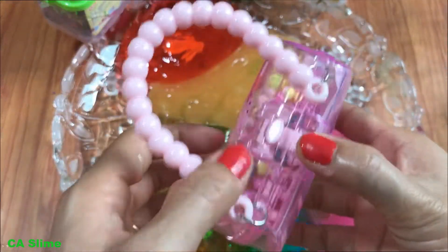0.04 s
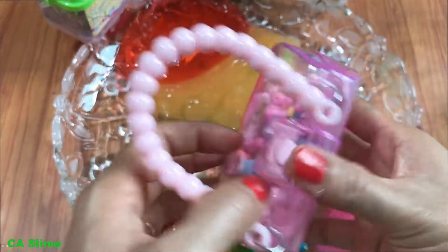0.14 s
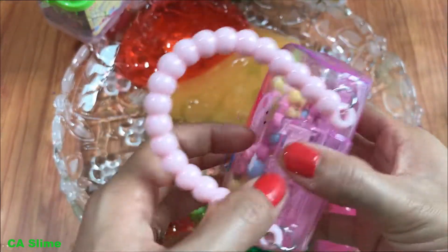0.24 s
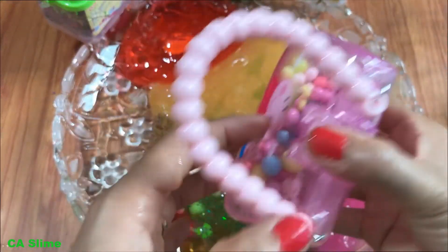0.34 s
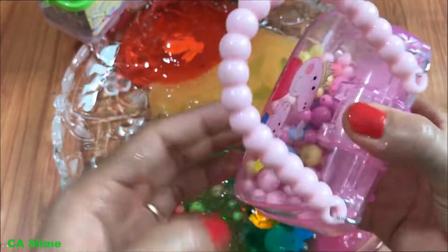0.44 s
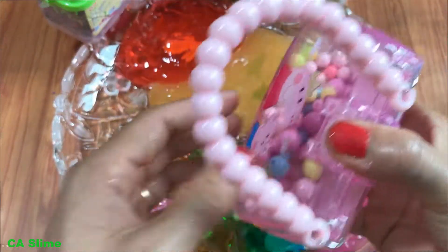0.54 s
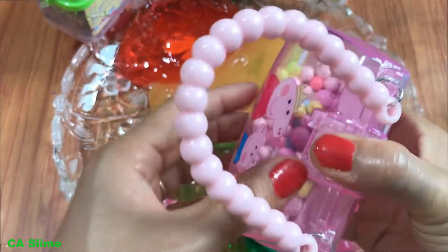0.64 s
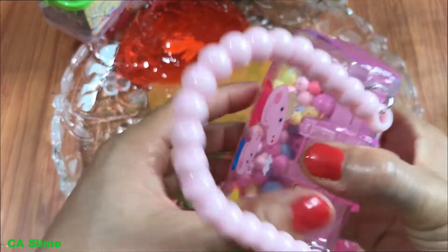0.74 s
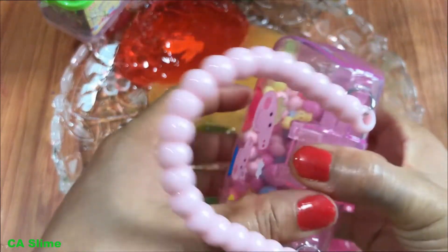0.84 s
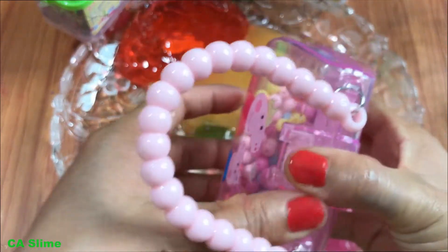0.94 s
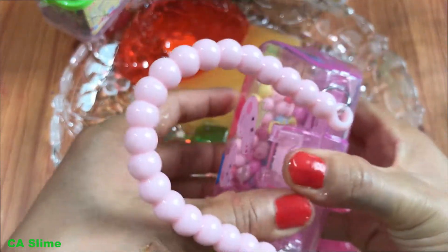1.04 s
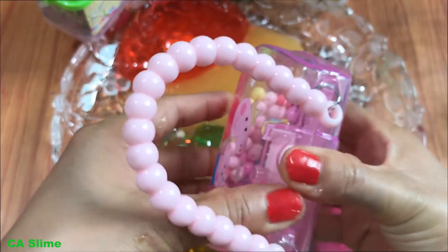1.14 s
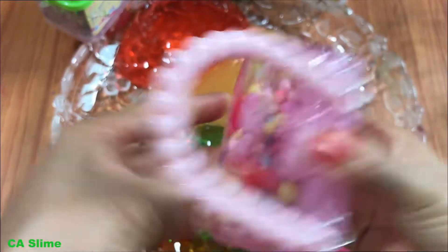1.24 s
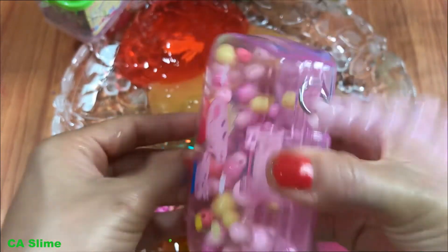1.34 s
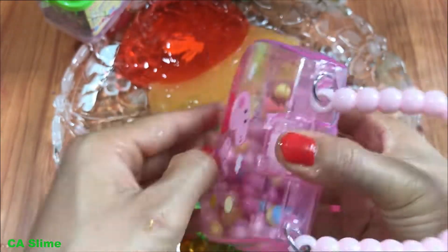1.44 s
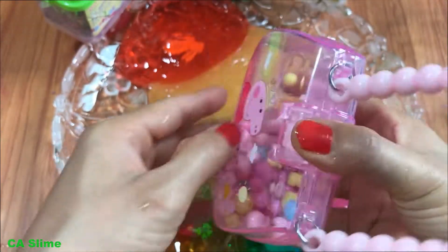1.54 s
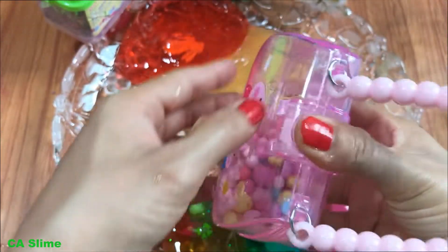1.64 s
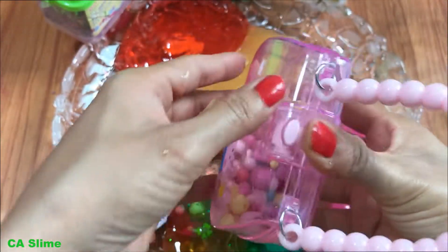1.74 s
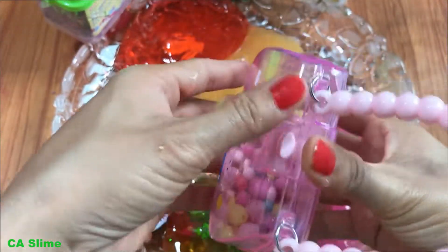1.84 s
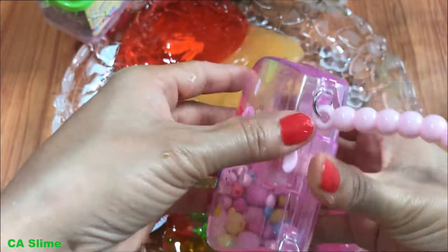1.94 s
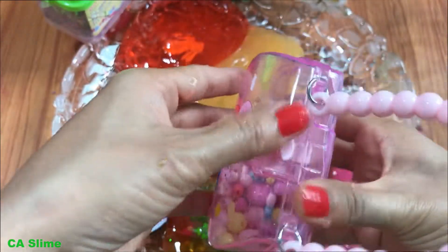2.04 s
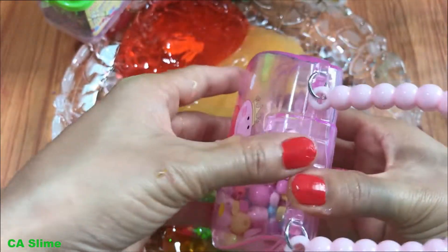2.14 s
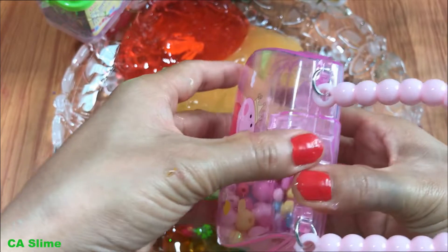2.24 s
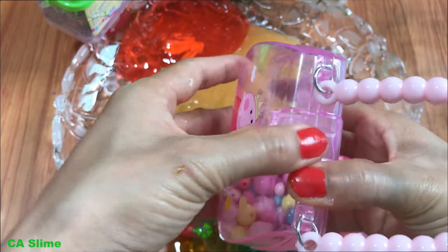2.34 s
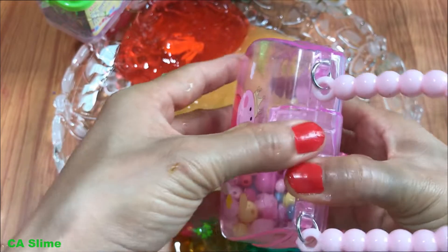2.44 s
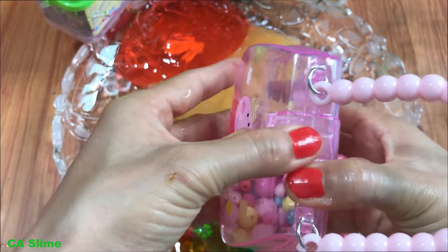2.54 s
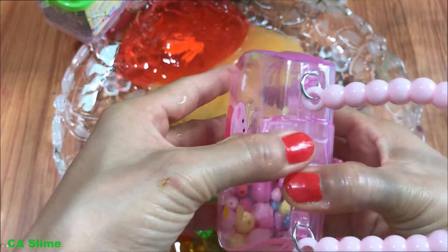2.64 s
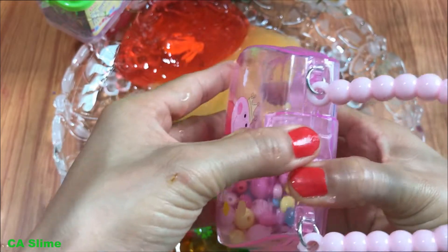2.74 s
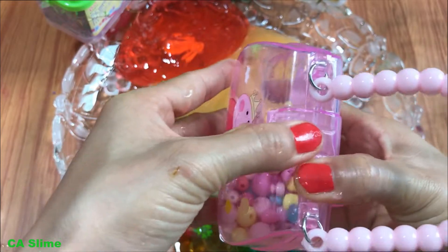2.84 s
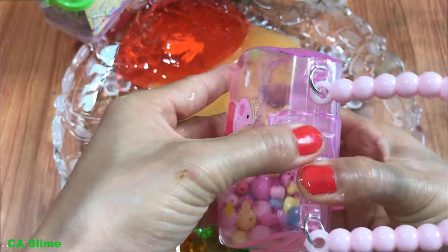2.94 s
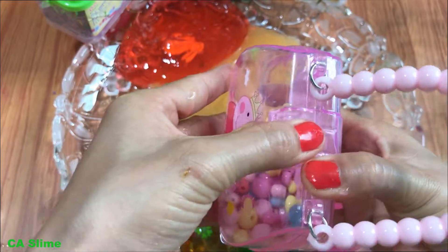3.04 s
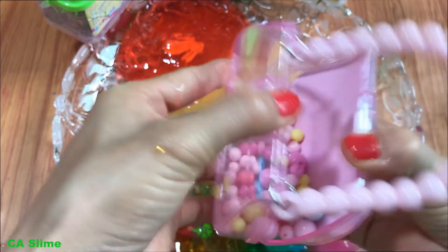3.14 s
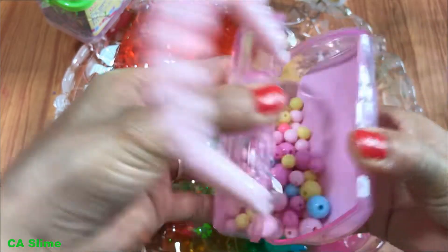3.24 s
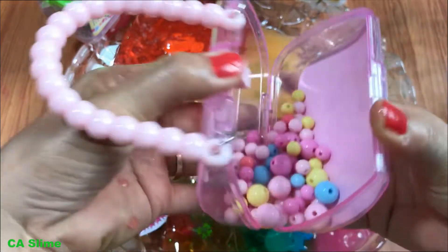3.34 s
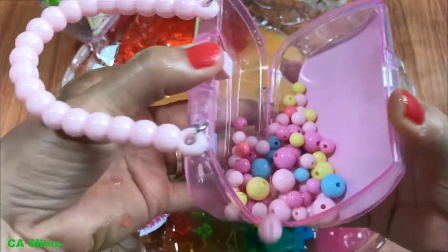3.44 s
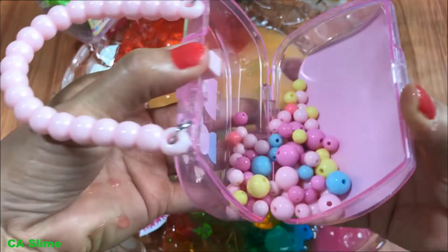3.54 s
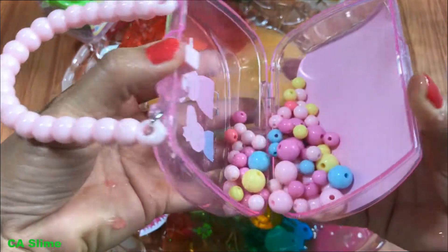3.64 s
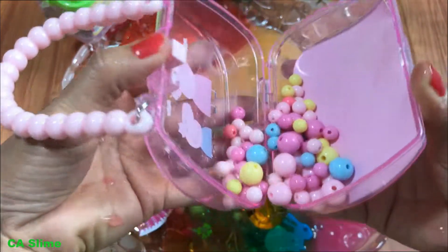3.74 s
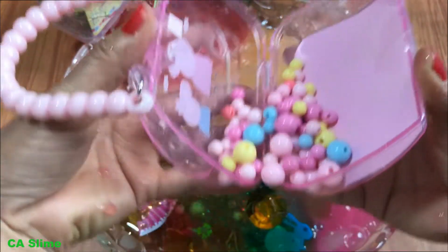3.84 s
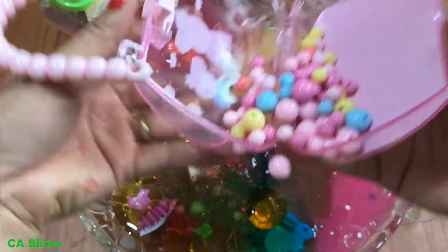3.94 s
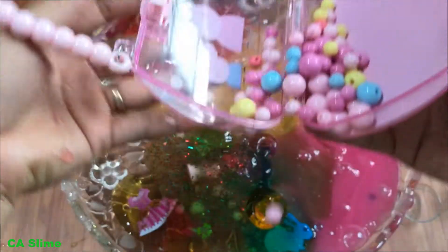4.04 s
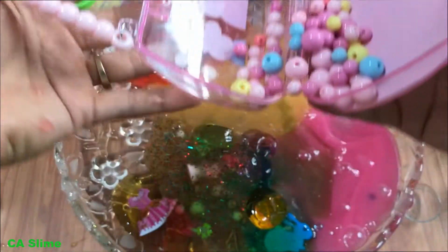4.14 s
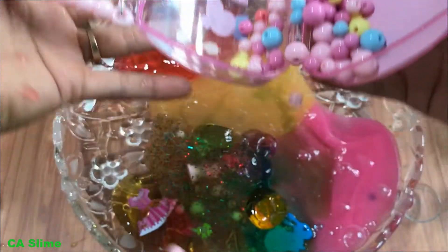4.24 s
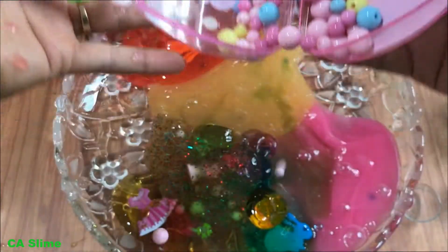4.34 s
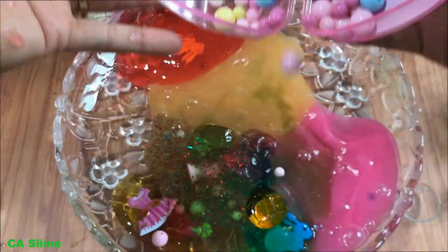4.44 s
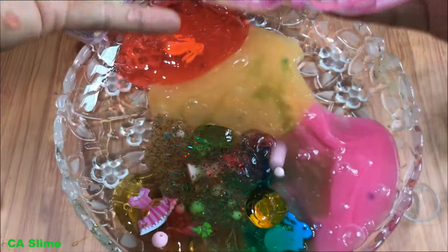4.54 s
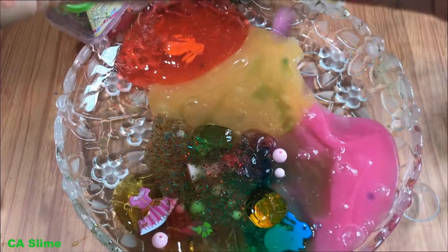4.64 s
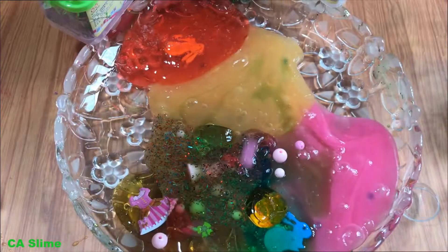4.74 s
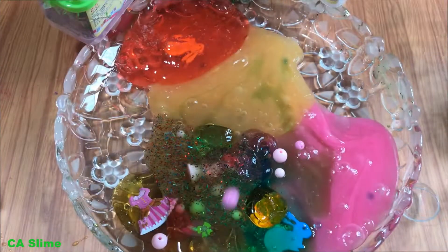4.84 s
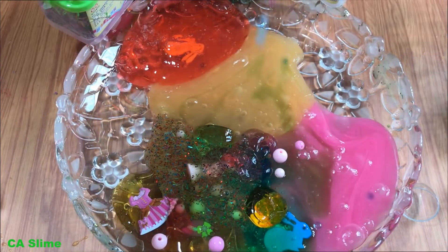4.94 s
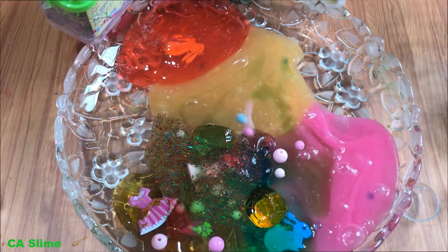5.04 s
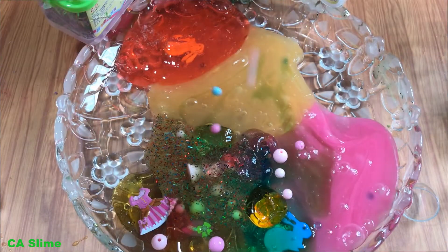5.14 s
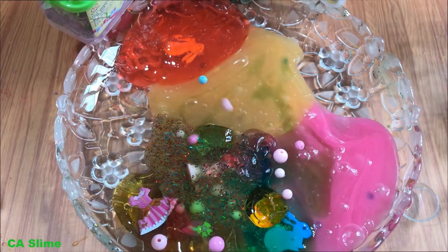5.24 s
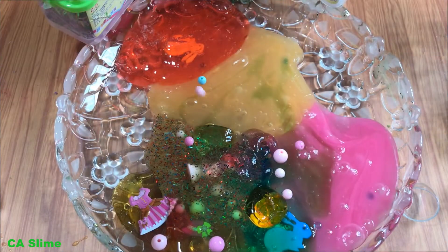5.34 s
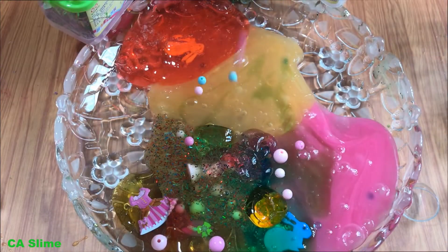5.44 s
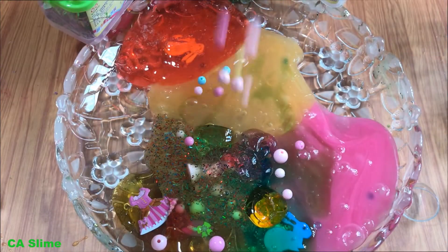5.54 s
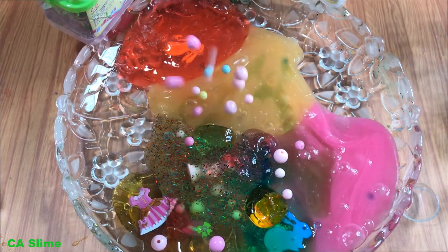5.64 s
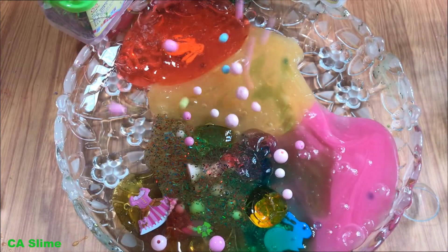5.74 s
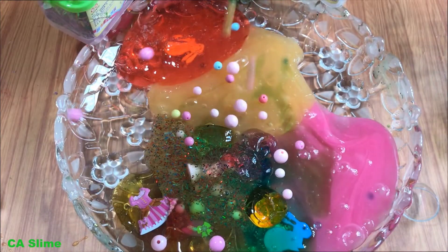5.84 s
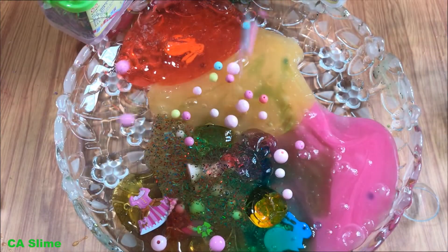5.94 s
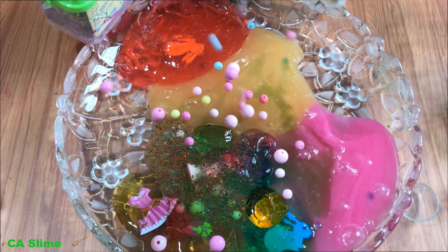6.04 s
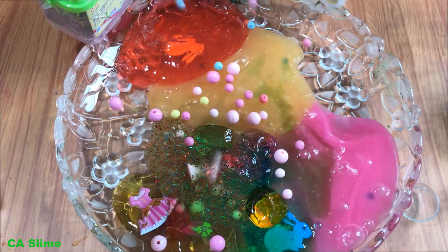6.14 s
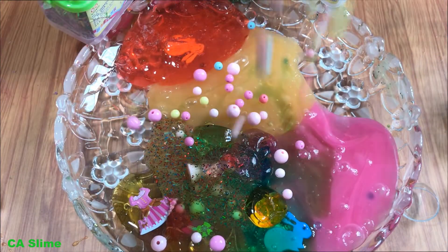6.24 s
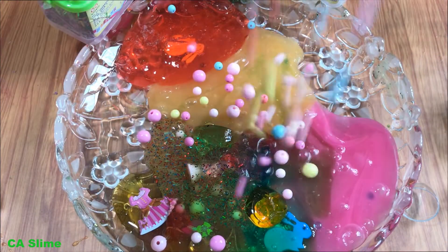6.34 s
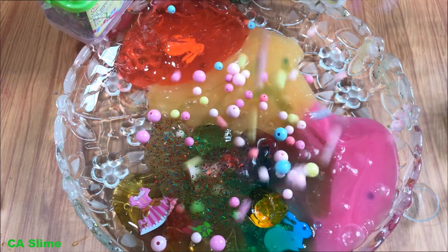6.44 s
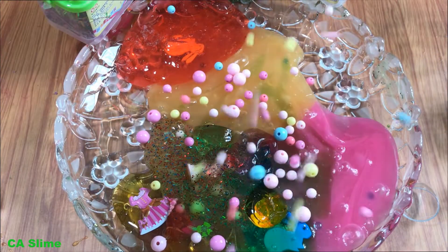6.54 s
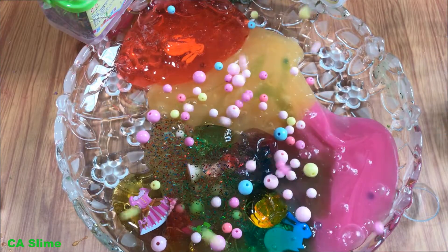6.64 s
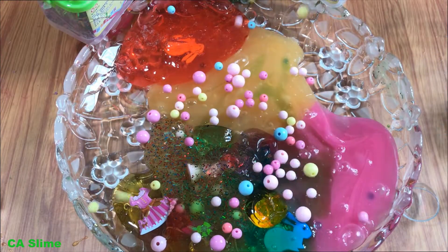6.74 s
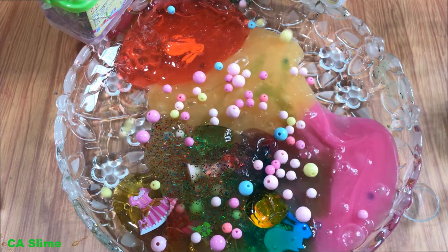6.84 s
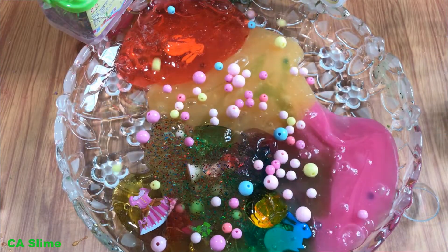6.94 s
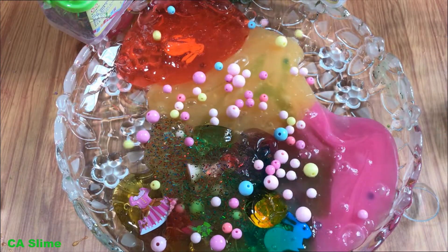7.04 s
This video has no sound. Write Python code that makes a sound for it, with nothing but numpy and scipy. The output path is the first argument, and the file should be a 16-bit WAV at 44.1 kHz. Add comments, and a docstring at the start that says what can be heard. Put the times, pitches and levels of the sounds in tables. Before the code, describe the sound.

A small quiet room, heard very close, with barely audible low room tone. From 0 to 1 s a few light rolls and clicks of plastic beads inside a shut plastic case, strongest near 0.7. At 1.3-1.5 s the case is flipped: a loud, dense, hard rattle with dull knocks, quickly dying. Stray taps fade to near silence from 2 to 3 s. Around 3.1-3.25 s a faint creak, latch scrape and sharp snap. From 3.4 s beads tick and slide in the open shell, with glassy clacks at 3.7 and 3.8 and a flurry around 4.1-4.2. Scattered taps follow to 5 s, then crisp clusters at 5.3-5.55 and 5.65-5.8. Soft thuds in slime begin near 6 s; the brightest, fullest spill comes at 6.2-6.35, then ticks, glass clicks and thuds to 6.9, ending in a small bright rattle at about 7 s.

```python
"""Beads in a plastic case, tipped over slime

Small plastic beads roll and rattle in a hand-held plastic case, which is turned over, prised open and tipped.
They slide along the open shell, knock on it and drop onto slime in a glass bowl; close up, in a small quiet room.
Each hard contact is a burst of damped, coloured noise, most with the ringing modes of the case or bowl.
The sliding heap and a latch scrape are crowds of such contacts; dull knocks, a faint creak and thuds in the
slime are clusters of low modes."""
import sys
import numpy as np
from scipy import signal
from scipy.fft import rfft, irfft
from scipy.io import wavfile
from scipy.ndimage import uniform_filter1d

SR = 44100
rng = np.random.default_rng(int(sys.argv[2]) if len(sys.argv) > 2 else 0)


def materialize(psi):
    """Save the field psi as 16-bit PCM at rate SR to the path in sys.argv[1].

    A 1-D psi becomes a single channel; in a 2-D psi each row is a channel.
    """
    bounded = np.clip(np.atleast_2d(psi).T, -1, 1)
    quanta = np.round(bounded * 32767).astype(np.int16)
    wavfile.write(sys.argv[1], SR, quanta)


N = 313551   # length [samples]
OPENS_S = 3.3   # contacts before this ring the shut case
CONTACT_SIZE = 2048   # length of one contact [samples]


def from_db(db):
    """Decibels to gain."""
    return 10 ** (np.asarray(db) / 20)


def unit(x):
    """Each row scaled to energy 1."""
    return x / np.sqrt(np.sum(x ** 2, axis=-1, keepdims=True) + 1e-20)


def at_hz(points, hz):
    """A table read on a log-frequency axis."""
    f, value = np.transpose(points)
    return np.interp(np.log(np.maximum(hz, 1)), np.log(f), value)


def bins(size):
    """Frequencies of a spectrum's bins."""
    return np.fft.rfftfreq(size, 1 / SR)


def each(times, value):
    """The same value for every contact."""
    return np.full(len(times), value, float)


def place(times, sounds):
    """Short sounds laid on the time line."""
    out = np.zeros(N + sounds.shape[1])
    starts = np.clip(times * SR, 0, N - 1).astype(int)
    for at, sound in zip(starts, sounds):
        out[at:at + len(sound)] += sound
    return out[:N]


# colour of the room tone: (frequency [Hz], relative density [dB per Hz])
ROOM_TONE_COLOUR = [(24, -14.5), (48, 1), (120, -5.5), (250, -9), (500, -17), (1000, -18.5), (4000, -30.5),
                    (8000, -33), (16000, -32.5)]
ROOM_TONE_DB = -66.5   # RMS level


def hush():
    """Faint, mostly low room tone: noise shaped in the spectrum."""
    colour = from_db(at_hz(ROOM_TONE_COLOUR, bins(N)))
    noise = irfft(rfft(rng.standard_normal(N)) * colour, N)
    return from_db(ROOM_TONE_DB) * np.sqrt(N) * unit(noise)


# how long the room rings: (frequency [Hz], decay by 60 dB [s])
ROOM_DECAY = [(150, 0.96), (1500, 0.39), (4000, 0.58), (8000, 0.34), (15000, 0.85)]


def room(x, wet_db=-15.5, table_db=-16.5, table_t60=0.026, gap_s=0.002):
    """Quick reflections from bowl and table, then a diffuse tail that decays at its own rate in each band."""
    t = np.arange(int(SR * .7)) / SR
    edges = np.geomspace(100, 17000, 9)
    tail = 0
    for low, high in zip(edges, edges[1:]):
        band_filter = signal.butter(2, [low, high], "band", fs=SR, output="sos")
        band = signal.sosfilt(band_filter, rng.standard_normal(len(t)))
        hz = np.sqrt(low * high)
        band_db = at_hz([(300, -2.5), (1200, 2.5), (5000, -2), (13000, -6.5)], hz)
        tail = tail + band * from_db(band_db - 60 * t / at_hz(ROOM_DECAY, hz))
    near = rng.standard_normal(len(t)) * from_db(-60 * t / table_t60)
    diffuse = from_db(wet_db) * unit(tail * (t > 2 * gap_s))
    reflections = from_db(table_db) * unit(near * (t > gap_s))
    return x + signal.fftconvolve(x, diffuse + reflections)[:N]


def widen(x, side_db=-28.5, above_hz=5000, size=96):
    """A faint scattered copy, treble only, is added left and subtracted right."""
    scatter = np.convolve(x, unit(rng.standard_normal(size)))[:N]
    treble_only = signal.butter(14, above_hz, "high", fs=SR, output="sos")
    side = from_db(side_db) * signal.sosfilt(treble_only, scatter)
    return np.array([x + side, x - side])


def swell(t, rise_s):
    """The sound builds up as the blow spreads through the plastic."""
    return 1 - np.exp(-t / np.maximum(rise_s, 1 / SR)[:, None])


def tone_db(hz, body, treble, body_hz=1500, middle_hz=3300, bright_hz=6500, treble_hz=11500):
    """Heavy blows have more body, small hard ones more treble."""
    body_tilt = at_hz([(body_hz, 1), (middle_hz, 0)], hz)
    treble_tilt = at_hz([(bright_hz, 0), (treble_hz, 1)], hz)
    return np.outer(body, body_tilt) + np.outer(treble, treble_tilt)


# basic colour of a bead's clack: (frequency [Hz], relative density [dB per Hz])
CLACK_COLOUR = [(250, -20), (450, -22.5), (620, -16.5), (820, -7.5), (1150, -6), (1450, -3), (1850, -3),
                (2300, -1.5), (2900, 0), (4500, 2.5), (6500, 4.5), (9000, 1.5), (12500, -4.5), (16000, -5)]
BEAD_PITCH_DB = 10   # how far a bead's own pitch stands out of its clack


def clack(body, treble, t60, crack=1.2, crack_s=0.00081, rise=0.014, low_hz=2200, high_hz=13000):
    """A brief crack, then crowded, quickly damped overtones around a pitch drawn for each bead."""
    t, hz = np.arange(CONTACT_SIZE) / SR, bins(CONTACT_SIZE)
    decay = from_db(-60 * t / np.maximum(t60, .002)[:, None])
    envelope = decay + crack * np.exp(-t / crack_s)
    pitch = low_hz * (high_hz / low_hz) ** rng.random((len(t60), 1))
    near_pitch = np.exp(-(np.log((hz + 1) / pitch) / .13) ** 2)
    bead_db = BEAD_PITCH_DB * near_pitch
    colour = from_db(at_hz(CLACK_COLOUR, hz) + tone_db(hz, body, treble) + bead_db)
    noise = irfft(rfft(rng.standard_normal(envelope.shape)) * colour)
    overtones = noise * envelope * swell(t, rise * t60)
    # so small a radiator gives off almost no bass
    return unit(signal.sosfilt(signal.butter(3, 420, "high", fs=SR, output="sos"), overtones))


def ring(modes, body, treble, t60, spread_db, grip, rise=0.0043):
    """Every contact point wakes the modes with strengths of its own; gripping fingers detune them a little."""
    hz, db, mode_t60 = np.transpose(modes)
    t = np.arange(CONTACT_SIZE) / SR
    shapes = unit(np.sin(2 * np.pi * np.outer(hz, t)) * from_db(-60 * t / mode_t60[:, None]))
    luck = rng.standard_normal((len(body), 3, len(hz)))   # for sign, strength and detuning
    strength_db = db + spread_db * luck[:, 1] + .5 * tone_db(hz, body, treble)
    rings = (np.sign(luck[:, 0]) * from_db(strength_db)) @ shapes
    stretch = 1 + grip * luck[:, 2, 0]
    rings = np.array([np.interp(t * k, t, one, right=0) for k, one in zip(stretch, rings)])
    return unit(rings * swell(t, rise * t60))


# modes of the shut case: (frequency [Hz], level [dB], decay by 60 dB [s])
SHUT_CASE_MODES = [(700, -13.5, 0.12), (1102, -1, .04), (1457, 3, 0.061), (1620, 1, .03), (2298, -1, 0.075),
                   (3120, 3.5, .035), (3776, 3, 0.073), (4170, 3.5, .03), (4350, 2, .025), (5840, 5, .025),
                   (6250, -7, .02), (6840, -5, .02), (9120, 1.5, .02)]


def strike(times, energy_db, body, treble, t60, share, ring_once_open):
    """Each contact is a clack plus the ring of what is hit: at first always the shut case."""
    share = np.clip(share, 0, 1)[:, None]   # of the energy, in the modes
    shut = times < OPENS_S
    shut_rings = ring(SHUT_CASE_MODES, body, treble, t60, spread_db=3.5, grip=0.011)
    rings = np.where(shut[:, None], shut_rings, ring_once_open)
    sounds = np.sqrt(1 - share) * clack(body, treble, t60) + np.sqrt(share) * rings
    return place(times, sounds * from_db(energy_db)[:, None])


def thuds(times, db, hz, t60, rise_s=0.00058, spread_octaves=.7, flank_db=-7.5, flank_damping=4.4, count=11):
    """Soft contacts: a damped low mode flanked by weaker neighbours that die sooner."""
    t = np.arange(SR // 6) / SR
    offset = np.linspace(-1, 1, count)   # 0 is the main mode
    spread = spread_octaves * offset * rng.uniform(0.7, 1, (len(times), count))
    pitches = hz[:, None] * 2 ** spread
    signs = rng.choice([-1, 1], (len(times), count, 1))
    mode_t60 = t60[:, None] / (1 + flank_damping * np.abs(offset))
    decay_db = -60 * t / mode_t60[:, :, None]
    levels = from_db(flank_db * np.sqrt(np.abs(offset))[:, None] + decay_db)
    modes = signs * levels * np.sin(2 * np.pi * pitches[:, :, None] * t)
    sounds = .5 * modes.sum(axis=1) * from_db(db)[:, None]
    return place(times, sounds * swell(t, each(times, rise_s)))


TICK_BODY_DB, TICK_TREBLE_DB, TICK_T60_S, TICK_CRACK_S = -8, 24, .0035, .0004


def tick(times, db):
    """Bead on bead: nothing large rings, so the clack is tiny and all treble."""
    body, treble = each(times, TICK_BODY_DB), each(times, TICK_TREBLE_DB)
    sounds = clack(body, treble, each(times, TICK_T60_S), crack=3.4, crack_s=TICK_CRACK_S)
    return place(times, sounds * from_db(db)[:, None])


# the heap of beads slides; at 3.12 s the latch scrapes as the case is opened:
# (start [s], length [s], relative level [dB], body [dB], treble [dB])
SLIDES_AND_SCRAPE = [(0.033, .03, -45, 10, -4), (0.08, .42, -49, 5, -7), (0.159, .04, -41.5, 5.5, -6.5),
                     (0.262, .085, -38.5, 4.5, -2), (0.552, .07, -38.5, 5, -9), (0.688, .015, -33, 5, -8),
                     (0.812, .06, -40.5, 7.5, -5.5), (1.03, .12, -64, 8, -13), (1.325, .025, -38, 13.5, -3),
                     (1.365, .04, -22, 7, 1), (1.412, .03, -18, 2, 4), (1.469, .04, -15.5, 3.5, 0.5),
                     (1.618, .08, -41, 4, -4), (1.891, .06, -54, 12, -13), (2.114, .06, -58, 14, -10),
                     (3.12, .05, -61, 30.5, -6), (3.179, .03, -33, 16, 13), (3.248, .012, -22.5, 3, 3),
                     (3.363, .29, -44, 7, -6), (3.865, .02, -44, 6, 11), (4.013, .05, -37, 7, -7),
                     (4.107, .085, -27.5, 3, 4.5), (4.359, .04, -44, 12, 0), (4.504, .085, -33, -2, -0.5),
                     (4.645, .015, -29.5, 3, 5), (4.78, .01, -39, -2, -17), (4.851, .17, -48, 7, -15),
                     (5.233, .04, -46, 11, -1), (4.935, .015, -34, 4, 1), (5.30, .04, -33, -9, 4),
                     (5.351, .10, -25.5, -0.5, 1), (5.49, .05, -30, -0.5, -2), (5.635, .07, -33, 6, 3),
                     (5.757, .11, -31, 2, 10), (5.926, .11, -44, 20, 9), (6.087, .03, -32, 5.5, 4),
                     (6.152, .04, -36, 11, -5), (6.194, .085, -20, -5.5, 8.5), (6.305, .095, -30, 4, 4.5),
                     (6.411, .19, -42, 4, -6), (6.489, .05, -35, 11, 15), (6.623, .015, -34, 22, 9),
                     (6.694, .015, -28, 10, 16), (6.894, .015, -32, 22.5, 26), (6.98, .13, -49, 14, 15)]
SLIDE_RISE_DB_PER_S, SLIDE_FALL_DB_PER_S = 801.5, 259.5   # the heap gives way at once and stops more slowly
SETTLE_DB, SETTLE_DB_PER_S = -18, 80   # a few beads go on settling


def motion(t):
    """Level, body and treble of heap and latch in dB: each rises, holds, falls, settles; the strongest counts."""
    start, length, db, body, treble = np.transpose(SLIDES_AND_SCRAPE)
    before = np.maximum(start - t[:, None], 0)
    after = np.maximum(t[:, None] - start - length, 0)
    release_db = np.maximum(-SLIDE_FALL_DB_PER_S * after, SETTLE_DB - SETTLE_DB_PER_S * after)
    slides_db = db - SLIDE_RISE_DB_PER_S * before + release_db
    strongest = slides_db.argmax(axis=1)
    return slides_db.max(axis=1), body[strongest], treble[strongest]


# modes of the open shell, for heap and taps: (frequency [Hz], level [dB], decay by 60 dB [s])
OPEN_SHELL_MODES = [(833.7, -9, 0.04), (1560, -14.5, 0.042), (2056, -0.5, 0.036), (2311, 3.5, 0.034),
                    (3138, -3.5, 0.083), (5235, -8, 0.018), (6504, 12, 0.026)]
SHUT_CROWDING = 1.8   # penned in the shut case, the beads collide this much more often


def heap_and_latch(gain_db=-0.5, clack_t60=0.027, share=0.15, uneven_db=6.5, count=1700):
    """The shifting heap and the latch scrape: many small uneven contacts, denser the harder the motion."""
    t = np.arange(N) / SR
    level_db = np.interp(t, t[::40], motion(t[::40])[0])
    busy = from_db(.42 * level_db) * np.where(t < OPENS_S, SHUT_CROWDING, 1)
    per_sample = count * busy / busy.sum()
    times = np.interp(np.arange(count) + rng.random(count), np.cumsum(per_sample), t)
    size_db = uneven_db * np.clip(rng.standard_normal(count), -2, 1.4)
    # neighbouring contacts share the energy of the motion
    size_db = size_db - 10 * np.log10(uniform_filter1d(from_db(size_db) ** 2, size=9))
    energy_db = gain_db + size_db + np.interp(times, t, level_db - 10 * np.log10(per_sample))
    _, body, treble = motion(times)
    t60 = each(times, clack_t60)
    plastic = ring(OPEN_SHELL_MODES, body, treble, t60, spread_db=8.5, grip=0.016)
    return strike(times, energy_db, body, treble, t60, each(times, share), plastic)


# dull knocks, and at 3.102 s a faint creak, as the case is handled and opened,
# and a heavy bead sinking in the slime: (time [s], level [dB], pitch [Hz])
KNOCKS_AND_CREAK = [(0.151, -37.5, 1073), (0.194, -38.5, 1098), (0.984, -44, 200), (1.011, -35.5, 240),
                    (1.284, -39, 660), (1.313, -33.5, 243), (1.318, -33.5, 723), (1.358, -27, 297),
                    (1.362, -25.5, 626), (1.366, -30.5, 129), (1.39, -29.5, 189), (1.422, -24, 680),
                    (1.490, -28, 686), (3.102, -50, 690), (3.173, -32.5, 760), (3.178, -25, 962),
                    (3.181, -27, 100), (3.210, -34, 1110), (3.254, -20, 1013), (5.971, -32, 384),
                    (5.972, -33.5, 602)]
KNOCK_T60_S, KNOCK_T60_SLOPE = 0.14, .5   # at 1 kHz; the hand damps lower knocks faster, by this power of pitch


def knocks_and_creak(gain_db=0.0):
    """Dull knocks and a faint creak; the lower they are, the sooner they die."""
    times, db, hz = np.transpose(KNOCKS_AND_CREAK)
    t60 = KNOCK_T60_S * (hz / 1000) ** KNOCK_T60_SLOPE
    return thuds(times, db + gain_db, hz, t60)


# modes of the glass bowl, damped by the slime, for landings and hits:
# (frequency [Hz], level [dB], decay by 60 dB [s])
BOWL_MODES = [(838, -11.5, 0.02), (1676, -10, 0.018), (2363, 7.5, 0.015), (2435, 7.5, 0.02),
              (3415, 1.5, 0.047), (4214, -0.5, 0.039), (5170, -46, 0.052), (5910, -1, 0.029),
              (7270, 2, 0.031), (8640, -0.5, 0.064), (9550, -6, 0.036), (11630, 4, 0.02), (13400, 2, .025)]
# a bead lands on the slime, clicking against those already there:
# (time [s], relative level [dB], treble [dB], thud pitch [Hz])
SLIME_LANDINGS = [(5.9693, -25, -26, 840), (6.0053, -29.5, 1, 860), (6.422, -24.5, 10, 1240),
                  (6.4623, -24, -2, 1006), (6.4961, -26.5, 5.5, 1290), (6.5344, -23, 10.5, 1214),
                  (6.65, -31.5, 14, 994), (6.842, -28, 2, 880), (6.9061, -23, 2.5, 1210)]
LANDING_BODY_DB, LANDING_T60_S = 8.5, 0.025
LANDING_TICK_DB = -3.5   # relative to the click
THUD_DB, THUD_T60_S = -1.5, 0.06   # the slime's thud, relative to the listed level


def landings(gain_db=25.0, share=0.13):
    """A short click, a trace of the glass, a tick against a neighbour and a thud in the slime."""
    times, db, treble, hz = np.transpose(SLIME_LANDINGS)
    body, t60 = each(times, LANDING_BODY_DB), each(times, LANDING_T60_S)
    glass = ring(BOWL_MODES, body, treble, t60, spread_db=6.0, grip=0)
    clicks = strike(times, db + gain_db, body, treble, t60, each(times, share), glass)
    neighbours = tick(times, db + gain_db + LANDING_TICK_DB)
    slime = thuds(times, db + THUD_DB, hz, each(times, THUD_T60_S), spread_octaves=0.42)
    return clicks + neighbours + slime


# two small beads meet: (time [s], relative level [dB])
BEAD_TICKS = [(5.1476, -25.5), (5.678, -26), (5.6869, -19.5), (5.7969, -25), (5.8062, -23), (6.451, -36),
              (6.510, -36), (6.5461, -32), (6.5917, -17), (6.671, -26), (7.0102, -37)]


def ticks(gain_db=19.0):
    """Thin ticks among the falling beads."""
    times, db = np.transpose(BEAD_TICKS)
    return tick(times, db + gain_db)


# a bead strikes the glass:
# (time [s], relative level [dB], body [dB], treble [dB], share of energy in the bowl's modes [0-1])
GLASS_HITS = [(3.6727, -17.5, 8.5, -1.5, 0.62), (3.8384, -17, 8.5, -7, 0.79), (4.2258, -26, 1, -14, 1),
              (4.2896, -25, -1, -14, 0.56), (4.3904, -29.5, 6, 2, .45), (4.6423, -21, 6.5, -1, 0.25),
              (4.6838, -29.5, 14, -23, .5), (5.5541, -26, 6.5, -8, .45), (5.9408, -21, 1, -9, 0.74),
              (6.622, -24.5, -23, 1, 0.9), (6.692, -20.5, 3.5, 6.5, 0.35), (6.7553, -25.5, 12, 3, .7),
              (6.891, -29.5, 14, 4, 0.35)]
BOWL_CLACK_T60_S = 0.064


def bowl_hits(gain_db=26.5):
    """Beads that miss the slime make the glass ring, the more the cleaner they hit."""
    times, db, body, treble, share = np.transpose(GLASS_HITS)
    t60 = each(times, BOWL_CLACK_T60_S)
    glass = ring(BOWL_MODES, body, treble, t60, spread_db=2.0, grip=0, rise=0.023)
    return strike(times, db + gain_db, body, treble, t60, share, glass)


# a bead taps the plastic: (time [s], relative level [dB], body [dB], treble [dB])
PLASTIC_TAPS = [(0.032, -38, 6, 3), (0.1502, -31.5, -5, -2), (0.1946, -38, -3, 4), (0.3268, -34, -16, 6),
                (0.428, -37, 4, -5), (0.4987, -35.5, 3, 0), (0.5404, -36.5, -2, -3), (0.5653, -32, -11, 12),
                (0.6085, -36, 12, 2), (0.6864, -28.5, 7.5, -8), (0.6964, -25.5, -20, 5),
                (0.7802, -34, 3, -11), (0.8126, -34, -30, 1), (0.855, -39, 6, -4.5),
                (0.8712, -37.5, -5, -9), (0.982, -44, 12, -23), (1.006, -37.5, 14, -5),
                (1.2803, -44, 4, -4), (1.3226, -34, 12, -1), (1.358, -18.5, -37, -15),
                (1.4153, -14.5, -1, 1), (1.434, -14.5, 10, 4), (1.4725, -28, 7, 11), (1.489, -15.5, 5, 15),
                (1.545, -26, 0, 8), (1.750, -38, 21, -10), (1.7859, -35.5, 4, -4), (1.891, -46, -24, -3),
                (1.958, -50, 3, -7), (2.019, -51, 19, -5), (2.0942, -44.5, 3, -8), (2.148, -40, -4.5, 3),
                (2.434, -53, 1, -19.5), (2.5414, -60.5, -1.5, -16), (2.6216, -59, 10, -10.5),
                (3.177, -33, 6.5, 3), (3.185, -23.5, -5, 8), (3.206, -26, -4, -1), (3.2505, -19, 6.5, -3),
                (3.3565, -38, 13, -13), (3.421, -26, 5, -4), (3.492, -32.5, -11, 4), (3.5411, -34, -4, 6),
                (3.5837, -33, -12, -3), (3.6164, -32, -7, 11), (3.653, -27.5, -34, 9),
                (3.815, -41, -25, -12), (3.8623, -22, -21, 6.5), (3.8873, -34, -21, -6),
                (3.935, -33, 4.5, -3), (3.9821, -34, 12, -24), (4.0051, -24, 6.5, -7),
                (4.0147, -27.5, -11, 2), (4.0932, -22, -16, 5), (4.122, -39, -14, 10),
                (4.1484, -24, -21, 5), (4.1831, -19, -0.5, -5.5), (4.364, -34.5, 8.5, -21),
                (4.431, -30, 9, -10), (4.4565, -31.5, 4, -5), (4.4921, -28, 6.5, -14),
                (4.5012, -24.5, 6, 13.5), (4.536, -21.5, -7, -10), (4.583, -35, -4, -15),
                (4.778, -29.5, 11, 9), (4.8876, -34, -2.5, -5), (4.9314, -19, -3, 5),
                (5.1058, -40, 11, -11), (5.243, -33.5, -10, 6), (5.2796, -22.5, -3, -6),
                (5.292, -21.5, -6, 10), (5.3096, -28, 1, -10), (5.3245, -27, 4, 7),
                (5.3385, -18, -2.5, 2.5), (5.41, -37, 15, -6), (5.432, -21.5, 0, 4), (5.4541, -17, -5, 7),
                (5.5, -19, -1, 6), (5.5186, -22, -6, 3), (5.532, -19.5, -25, 10), (5.6325, -22.5, 9, 4),
                (5.669, -21.5, -7, 13), (5.7567, -21, 1.5, 9.5), (5.814, -27.5, -7, -5),
                (5.8237, -44, -12, -7), (5.839, -25, 2, -14), (5.8654, -27, 4, -13), (5.9123, -34, -10, -9),
                (6.0527, -18.5, -2, 11.5), (6.0845, -21.5, 9, 8), (6.104, -26, -10, 10),
                (6.192, -21, -2, 8), (6.208, -17.5, -20, 4), (6.2298, -28, 8, 22), (6.2654, -17.5, -28, 3),
                (6.2707, -26, 0, 1), (6.3059, -25.5, 3.5, 2), (6.33, -15.5, -26, 4), (6.358, -23, -18, 9),
                (6.592, -21, -3, 7), (6.7997, -30.5, 5.5, 5), (7.053, -22, 1, 16.5)]
SHUT_TAP_T60_S, OPEN_TAP_T60_S = 0.045, 0.032   # a clack lasts longer in the shut case
TAP_RING_SHARE = .12   # share of energy in the modes
SMALL_BEAD_DAMPING = 0.14   # dB by which a tap shortens per dB of added treble


def taps(gain_db=25.0):
    """Contacts that stand out, on the shut case and later the open shell; small bright beads sound shorter."""
    times, db, body, treble = np.transpose(PLASTIC_TAPS)
    case_t60 = np.where(times < OPENS_S, SHUT_TAP_T60_S, OPEN_TAP_T60_S)
    t60 = case_t60 * from_db(-SMALL_BEAD_DAMPING * np.maximum(treble, 0))
    plastic = ring(OPEN_SHELL_MODES, body, treble, t60, spread_db=7.5, grip=0.027)
    return strike(times, db + gain_db, body, treble, t60, each(times, TAP_RING_SHARE), plastic)


def scene():
    """Beads, case and bowl in the room, over its tone."""
    contacts = heap_and_latch() + knocks_and_creak() + landings() + ticks() + bowl_hits() + taps()
    return widen(room(contacts) + hush())


CEILING, CUTOFF_HZ = .78, 16000   # peak limit before the filter [full scale 1]; top of the band


def record(dry):
    """The very highest peaks are rounded off and the top is cut steeply."""
    rounded = dry / (1 + (dry / CEILING) ** 6) ** (1 / 6)
    return signal.sosfilt(signal.ellip(10, .2, 80, CUTOFF_HZ, fs=SR, output="sos"), rounded)


dry = scene()
out = record(dry)
materialize(out)
```